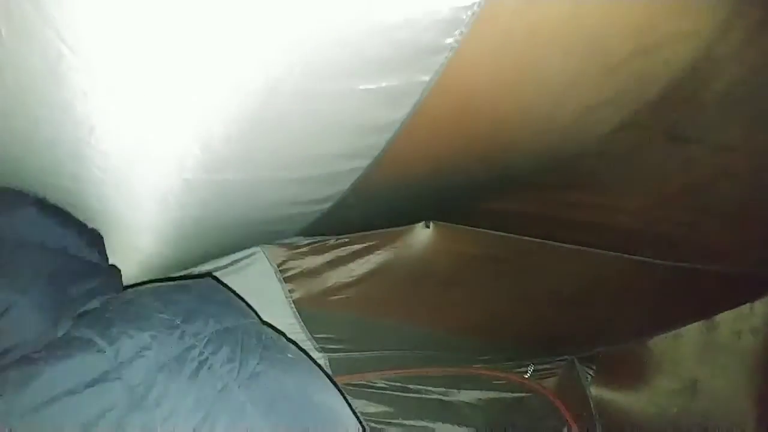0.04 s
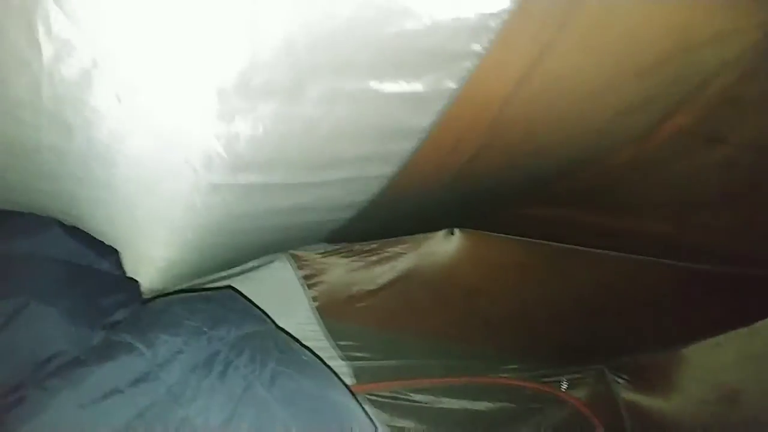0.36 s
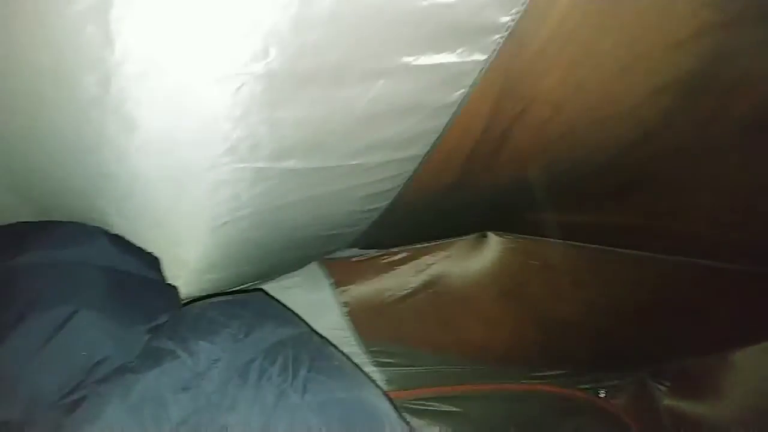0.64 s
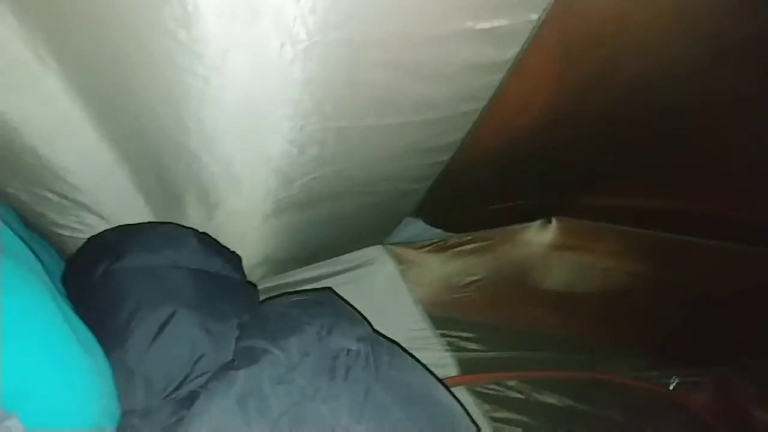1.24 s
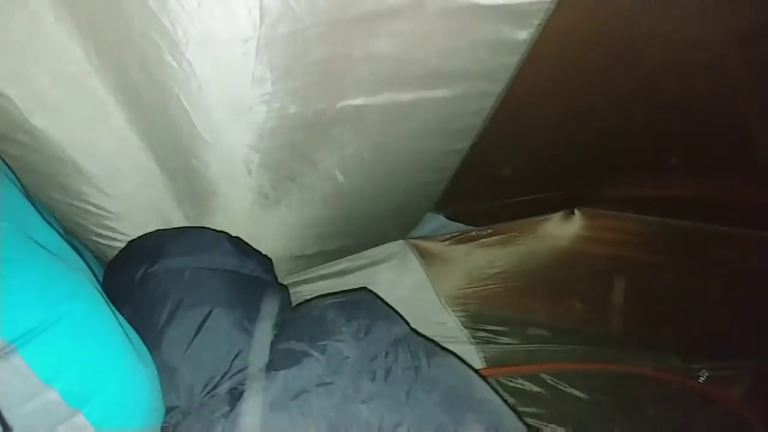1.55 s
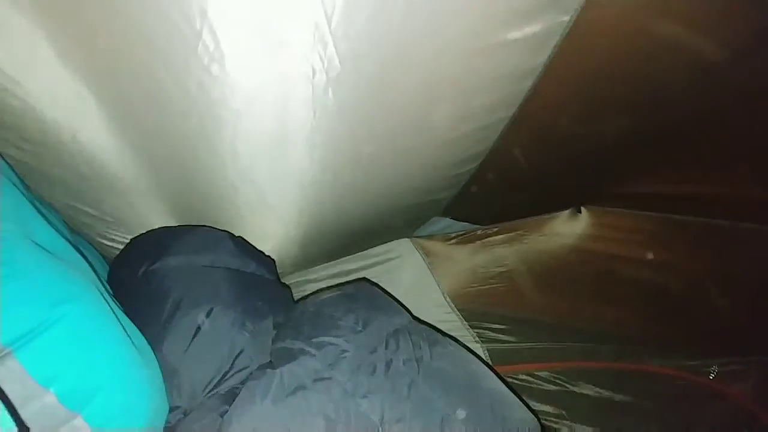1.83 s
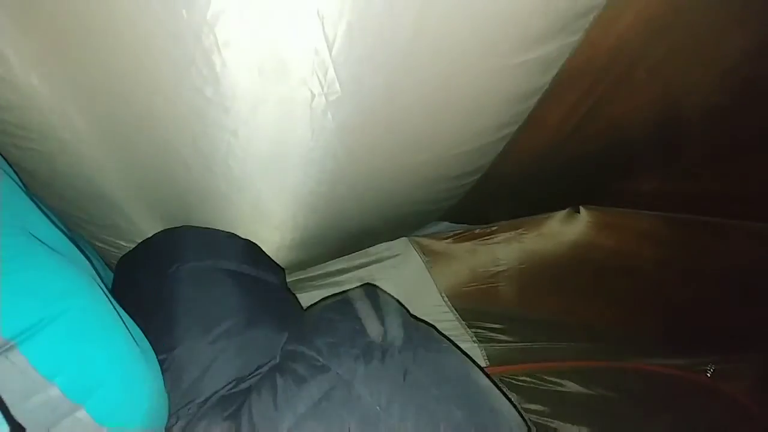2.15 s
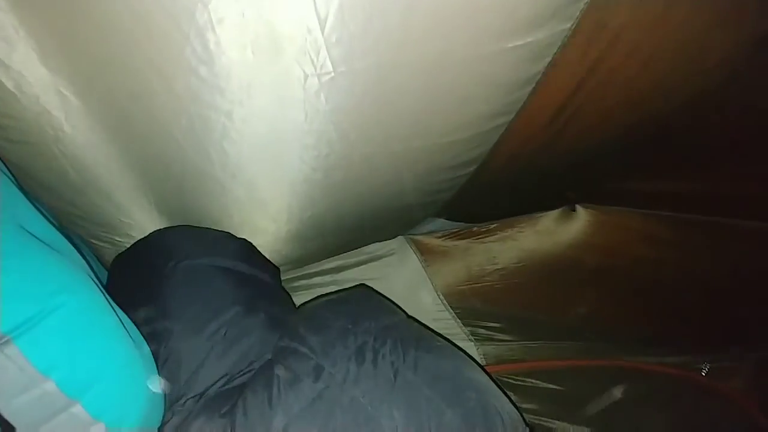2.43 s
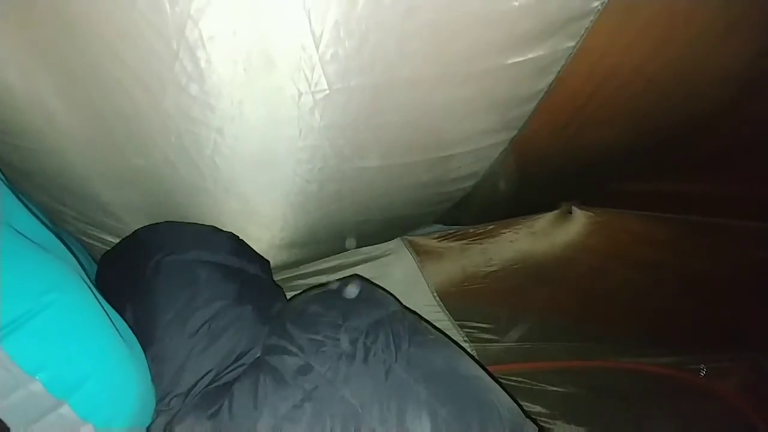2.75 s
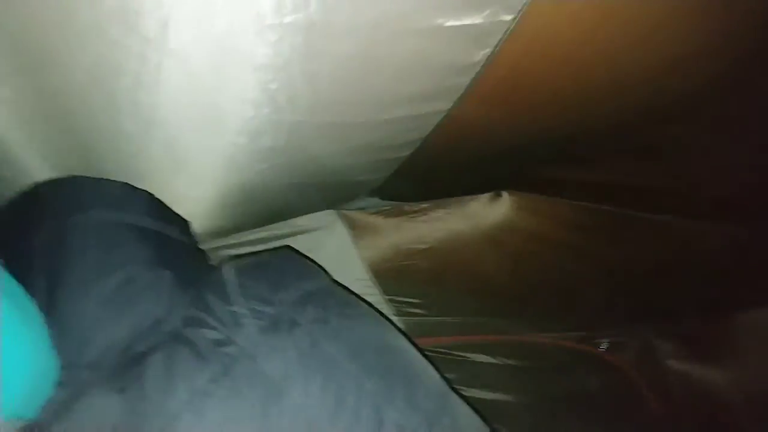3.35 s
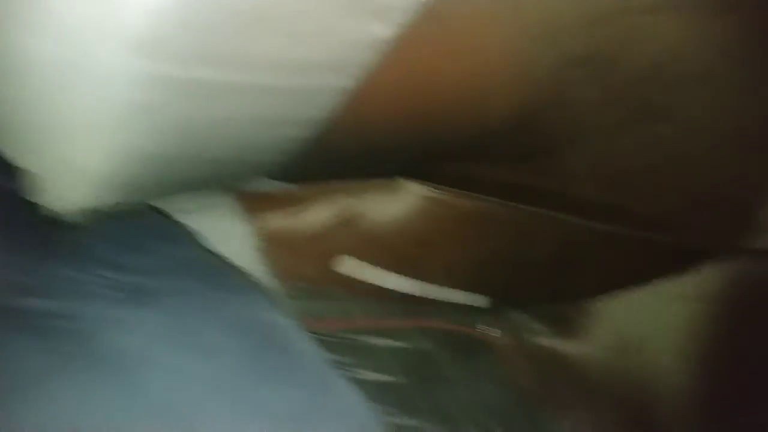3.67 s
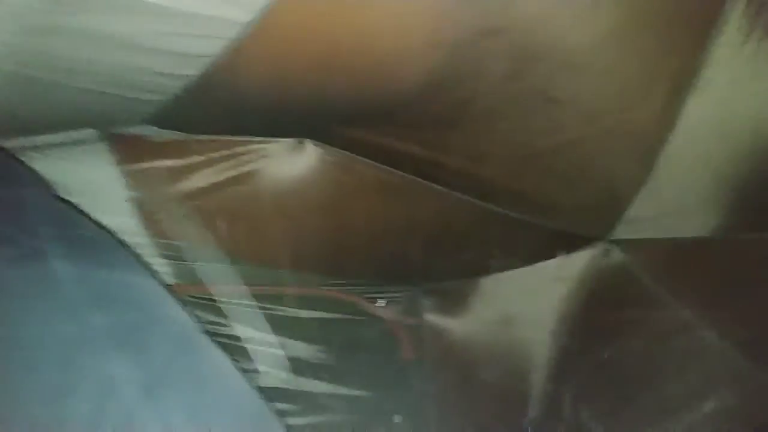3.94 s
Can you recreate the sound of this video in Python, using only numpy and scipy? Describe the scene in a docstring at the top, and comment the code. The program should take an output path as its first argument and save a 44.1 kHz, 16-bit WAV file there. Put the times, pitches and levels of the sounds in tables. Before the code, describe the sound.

Tent fabric flaps and drums unevenly in rumbling wind, heard from inside. A gust brings thumps, rustling and a crease snap in the first 0.7 seconds. The wind then eases, with small ticks on the cloth just after 1 second and between 2.5 and 2.9 seconds. From 3 seconds it builds again, with swishes, thumps and flaps strongest around 3.5 to 3.9 seconds.

```python
"""Tent walls in gusty wind, heard from inside: taut panels drum in quick uneven beats,
thump as they fill with air and flap where loose. The fabric rustles, hisses and swishes as it
slides; creases snap. Behind it, turbulent air rumbles and rushes over the walls.
The wind eases midway, where a few small ticks stand out, then builds again."""
import sys
import numpy as np
from scipy import signal
from scipy.fft import rfft, irfft
from scipy.io import wavfile

SR = 44100
rng = np.random.default_rng(int(sys.argv[2]) if len(sys.argv) > 2 else 0)


def dump(signal):
    """Clip the signal to [-1, 1] and save it as 16-bit WAV at the path in sys.argv[1]."""
    limited = np.clip(np.atleast_2d(signal).T, -1, 1)
    pcm = np.round(limited * 32767).astype(np.int16)
    wavfile.write(sys.argv[1], SR, pcm)


N = 176400
T = np.arange(N) / SR

# Level curves. Each row: time in seconds, relative level in dB.
AIR_PRESSURE_DB = [(0, -48), (.14, -33), (.3, -38.5), (.6, -41.5), (.83, -41.5), (.93, -48), (1.2, -45),
                   (1.39, -43.5), (1.48, -42.5), (1.62, -43), (1.9, -52), (1.97, -43), (2.18, -50),
                   (2.37, -44.5), (2.66, -53), (3, -43.5), (3.3, -45), (3.6, -44.5), (3.72, -42), (4, -43)]
GUST_DB = [(0, -45.5), (.09, -39.5), (.125, -40), (.25, -37.5), (.31, -43), (.48, -42), (.57, -40.5),
           (.7, -46), (.84, -46), (1.08, -49), (1.22, -45.5), (1.36, -50), (1.6, -53.5), (1.74, -53),
           (2.06, -46), (2.15, -54), (2.23, -46), (2.32, -53.5), (2.6, -55), (2.85, -50.5), (2.93, -45),
           (3.15, -47), (3.34, -43), (3.4, -41), (3.59, -46.5), (3.68, -50), (3.78, -45.5), (3.815, -35),
           (3.86, -47.5), (3.91, -42), (3.95, -47), (4, -46)]
HISS_DB = [(0, -48.5), (.1, -54), (.45, -58), (.6, -51.5), (.65, -57), (.85, -58.5), (1.02, -63.5),
           (1.14, -60), (1.235, -57), (1.3, -66.5), (1.37, -57.5), (1.43, -63), (1.68, -65.5), (1.96, -63),
           (2.05, -59.5), (2.12, -65.5), (2.87, -64.5), (2.92, -61.5), (3.15, -55), (3.22, -62),
           (3.34, -61), (3.4, -56.5), (3.595, -55.5), (3.61, -65), (3.69, -63), (3.73, -57), (3.86, -59.5),
           (3.91, -53), (4, -63)]
RUBBING_DB = [(0, -50), (.1, -41), (.18, -52), (.24, -42), (.31, -43.5), (.46, -43.5), (.57, -38),
              (.63, -40), (.69, -45), (.84, -47.5), (1.02, -50), (1.17, -47), (1.28, -50), (1.54, -52),
              (1.67, -56), (1.96, -53), (2.06, -49), (2.13, -55), (2.85, -55), (2.93, -46.5), (3.02, -45),
              (3.14, -47), (3.18, -49.5), (3.33, -46.5), (3.39, -40), (3.59, -39), (3.61, -48.5),
              (3.68, -50), (3.73, -45), (3.83, -44), (3.85, -51), (4, -49)]
DRUMMING_DB = [(0.0, -62), (0.02, -38), (0.17, -35.5), (0.41, -40.5), (0.46, -36), (0.54, -40), (0.57, -37),
               (0.61, -39.5), (2.8, -43), (3.53, -37.5), (3.63, -38), (3.66, -43.5), (3.75, -45),
               (3.83, -33.5), (3.87, -39.5), (4.0, -41.5)]

# Sheet sliding on sheet. Each row: middle in seconds, length in seconds, relative level in dB,
# centre in Hz, fall on either side in dB per octave.
SWISH_EVENTS = [(0.229, 0.042, -41.5, 2240, 17), (.545, 0.014, -38, 2780, 10),
                (.569, 0.019, -38.5, 2660, 23), (0.597, 0.021, -48, 5450, 22), (2.956, .05, -51, 1800, 25),
                (3.008, 0.064, -43.5, 1750, 38), (3.012, 0.045, -52.5, 4400, 32),
                (3.133, 0.065, -47, 1900, 42), (3.438, 0.15, -45.5, 3640, 27),
                (3.548, 0.025, -37.5, 4620, 24), (3.549, .07, -40.5, 2960, 45),
                (3.587, 0.031, -32.5, 4150, 19), (3.728, .07, -44.5, 3050, 26),
                (3.757, 0.013, -35, 3270, 15), (3.82, 0.05, -45, 3420, 15)]
# Ticks on the fabric. Each row: start in seconds, peak in dB, left over right in dB.
TICK_EVENTS = [(0.594, -42, -3), (1.064, -37, 0), (1.154, -31, 0), (1.236, -42, 2), (2.5175, -33, -2),
               (2.608, -33.5, -1), (2.649, -37, -4), (2.731, -34, 1), (2.804, -34.5, -3),
               (2.8955, -30.5, 2), (3.757, -34, 2)]
# Crease snaps and panel flaps. Each row: start in seconds, relative level in dB,
# left over right in dB, pitch in Hz.
SNAP_EVENTS = [(0.2686, -19, -3, 4260), (0.566, -25, -3, 2480), (1.064, -39, 4, 3530),
               (1.388, -38, 14, 5300), (2.279, -38, 4, 4430), (3.001, -33, -12, 1960),
               (3.018, -29.5, 5, 4230), (3.592, -28, 2, 3450), (3.815, -35, -2, 3850),
               (3.832, -34, 1, 3350)]
FLAP_EVENTS = [(0.116, -26, 8.5, 690), (0.153, -32, -5, 430), (0.181, -37, -8, 424),
               (0.222, -28.5, -8, 447), (0.774, -37, -4, 445), (1.832, -37.5, 2, 380), (2.232, -53, 2, 600),
               (2.421, -40, -1, 543), (3.383, -30.5, 0, 404), (3.446, -38, 0, 424), (3.811, -27, 2, 506),
               (3.835, -30, -2.5, 306), (3.893, -28, 3, 420), (3.9895, -28, -5, 920)]
# Wall pulled taut. Each row: start in seconds, envelope peak in dB, starting pitch in Hz.
THUMP_EVENTS = [(0.147, -22, 89), (0.235, -27, 130), (0.463, -28, 126), (0.562, -23.5, 130),
                (1.298, -37.5, 95), (1.628, -29, 141), (2.228, -31.5, 131), (2.995, -29.5, 139),
                (3.558, -26, 185), (3.588, -23.5, 183), (3.624, -21, 152), (3.829, -28, 175)]

# Source spectra. Each row: frequency in Hz, relative density in dB.
RUMBLE_SPECTRUM = [(10, -43), (24, -13), (38, -2.5), (62, 1), (85, 3.5), (115, -12.5), (250, -43),
                   (2000, -90)]
RUSH_SPECTRUM = [(130, -26), (230, -4.5), (310, 0.5), (420, -2), (550, -2), (700, -6), (950, -5),
                 (1300, -13), (2200, -16), (5000, -62), (16000, -75)]
HISS_SPECTRUM = [(2500, -9.5), (5000, 3), (6500, -3), (7600, 2), (8800, -0.5), (10200, -8.5), (12000, -13),
                 (16000, -23.5)]
RUSTLE_SPECTRUM = [(400, -31), (900, -7.5), (1300, 1), (2000, 1.5), (2700, -1.5), (3600, -2.5), (4500, -3),
                   (5400, -6), (6400, -14), (9000, -21), (16000, -28)]
TICK_SPECTRUM = [(300, -13), (1500, -1), (3000, -8), (5000, -2), (7000, -5.5), (9500, -4.5), (12000, -18.5),
                 (16000, -21)]
SNAP_SPECTRUM = [(500, -25), (2000, -13), (2900, -8), (3500, -20), (4500, -11), (5300, -11), (8000, -16.5),
                 (11000, -29), (16000, -30)]
FLAP_SPECTRUM = [(60, -22.5), (200, -16.5), (400, -2.5), (800, -16.5), (1300, -5.5), (2500, -26.5),
                 (6000, -37), (16000, -65)]
PANEL_SPECTRUM = [(45, -27.5), (75, -14), (95, -2.5), (130, 1.5), (170, -2.5), (200, -5), (235, -14.5),
                  (320, -15.5), (420, -20), (800, -57), (4000, -73)]
# Likeness of left and right. Each row: frequency in Hz, correlation from 0 to 1.
STEREO_CORRELATION = [(30, 0.95), (60, 0.82), (130, 0.85), (290, 0.84), (640, 0.49), (1400, 0),
                      (16000, 0.03)]


def amp(db):
    """Decibels to gain."""
    return 10 ** (np.asarray(db) / 20)


def unit(x):
    """Scales to rms 1."""
    return x / np.sqrt(np.mean(x ** 2) + 1e-20)


def at_hz(table, hz):
    """Table lookup on a log-frequency axis."""
    table_hz, values = np.transpose(table)
    return np.interp(np.log(hz + 1), np.log(table_hz + 1), values)


def level(curve_db):
    """Level curve to gain per sample."""
    return amp(np.interp(T, *np.transpose(curve_db)))


def pan(left_db):
    """Stereo gains; positive is left."""
    return amp([[left_db / 2], [-left_db / 2]])


def add(mix, start_s, sound):
    """Mixes a sound in place."""
    part = mix[:, round(start_s * SR):][:, :sound.shape[1]]
    part += sound[:, :part.shape[1]]


def noise(size=N):
    """Two independent white noises."""
    return rng.standard_normal((2, size))


def wander(hz):
    """Random drift below a rate, rms 1."""
    ratio = np.fft.rfftfreq(N, 1 / SR) / hz
    return unit(irfft(rfft(rng.standard_normal(N)) / (1 + ratio ** 4), N))


def flutter(hz):
    """Random flicker around a rate, rms 1."""
    ratio = np.fft.rfftfreq(N, 1 / SR) / hz
    return unit(irfft(rfft(rng.standard_normal(N)) * ratio / (1 + ratio ** 3), N))


def grains(per_s, spread_db, decay_s):
    """Tiny random noise bursts of uneven strength."""
    sizes = amp(spread_db * np.minimum(rng.exponential(1, N), 4))
    onsets = rng.random(N) < per_s / SR
    power = signal.lfilter([1], [1, -np.exp(-2 / (decay_s * SR))], (sizes * onsets) ** 2)
    return unit(np.sqrt(power) * noise())


def colour(pair, spectrum):
    """Minimum-phase filter; also correlates the channels in the bass."""
    hz = abs(np.fft.fftfreq(pair.shape[1], 1 / SR))
    log_gain = np.log(amp(at_hz(spectrum, hz)))
    response = np.exp(np.conj(signal.hilbert(log_gain)))
    correlation = np.clip(at_hz(STEREO_CORRELATION, hz), 0, 1)
    left, independent = np.fft.fft(pair)
    right = correlation * left + np.sqrt(1 - correlation ** 2) * independent
    return np.fft.ifft(response * np.array([left, right])).real


def steadied(x, window_s):
    """Evens out swells longer than the window; rms 1."""
    power = signal.fftconvolve((x ** 2).mean(0), np.hanning(int(window_s * SR)), "same")
    return unit(x / np.sqrt(abs(power) + 1e-12))


def air_rumble():
    """Turbulent air pumps the whole tent, more on the right."""
    rumble = steadied(colour(noise(), RUMBLE_SPECTRUM), window_s=0.4)
    return amp(0.4) * pan(-7.5) * level(AIR_PRESSURE_DB) * rumble


def wind_rush():
    """Wind rushes over the walls, with soft pats of rippling cloth."""
    drive = noise() + amp(-3.5) * grains(per_s=150, spread_db=3, decay_s=0.0032)
    rush = steadied(colour(drive, RUSH_SPECTRUM), window_s=0.077)
    return amp(-0.5) * pan(-2.2) * level(GUST_DB) * rush


def cloth_hiss():
    """Smooth cloth slides with a fine, flickering hiss."""
    hiss = colour(noise(), HISS_SPECTRUM)
    flicker_db = 1.03 * flutter(hz=21.8) + 0.56 * flutter(hz=200)
    return amp(4.5) * pan(0.3) * level(HISS_DB) * unit(hiss * amp(flicker_db))


def cloth_rustle():
    """Fabric rubs and crinkles, flickering as it flutters."""
    drive = noise() + amp(-4) * grains(per_s=400, spread_db=4, decay_s=0.0017)
    rustle = colour(drive, RUSTLE_SPECTRUM) * amp(1.05 * flutter(hz=35.4))
    return amp(0.8) * pan(-0.72) * level(RUBBING_DB) * steadied(rustle, window_s=0.15)


def sheet_swishes():
    """A sheet slides and stops: a swell of friction noise around one pitch."""
    out, t = np.zeros((2, N)), np.arange(8192) / SR
    flicker = amp(1.2 * flutter(hz=150))
    octaves = np.arange(-32, 33) / 8
    distance_oct = np.hypot(octaves, 0.15) - 0.15  # rounds the band's top
    for middle_s, length_s, db, centre_hz, fall_db_per_oct in SWISH_EVENTS:
        band_db = np.maximum(-fall_db_per_oct * distance_oct, -70)
        band = np.column_stack([centre_hz * 2 ** octaves, band_db])
        friction = unit(colour(noise(len(t)), band))
        swell = np.sin(np.pi * np.minimum(t / length_s, 1))
        add(out, middle_s - length_s / 2, amp(db) * swell * friction)
    return pan(-1.5) * flicker * out


def wall_reflections(x, wet_db, reach_s, count=14):
    """Close walls add quick reflections, different in each channel."""
    out = x.copy()
    gain = amp(wet_db) / np.sqrt(count)
    for channel in range(2):
        for place, sign in zip(rng.random(count), rng.choice([-1, 1], count)):
            lag = 20 + int(place * reach_s * SR)
            out[channel, lag:] += sign * gain * x[channel, :-lag]
    return out / np.sqrt(1 + amp(wet_db) ** 2)


def crackles(events, spectrum, crack_s, tail_db, tail_s):
    """Each hit crackles briefly in the cloth and scatters off the walls."""
    out, t = np.zeros((2, N)), np.arange(4096) / SR
    envelope = np.exp(-t / crack_s) + amp(tail_db) * np.exp(-t / tail_s)
    for start_s, db, left_db, *_ in events:
        burst = colour(envelope * noise(len(t)), spectrum)
        burst /= abs(burst).max(1, keepdims=True)
        add(out, start_s, amp(db) * pan(left_db) * burst)
    return out


def swing(t, hz, rise_s, sag_per_s=0):
    """Cloth pulled tight swings out and dies in a few cycles; pitch may sag."""
    envelope = (t / rise_s * np.exp(1 - t / rise_s)) ** 2
    cycles = np.cumsum(hz * np.exp(-sag_per_s * t)) / SR
    return -envelope * np.sin(2 * np.pi * cycles)


def direct_swings(events, rise_cycles, left_lag_s=0.00029):
    """Direct sound of flaps or snaps, arriving on the right first."""
    out, t = np.zeros((2, N)), np.arange(2048) / SR
    for start_s, db, left_db, hz in events:
        add(out, start_s, amp(db) * pan(left_db) * swing(t, hz, rise_s=rise_cycles / hz))
    return np.array([np.interp(T - left_lag_s, T, out[0]), out[1]])


def fabric_ticks():
    """Small bright ticks on the fabric."""
    return crackles(TICK_EVENTS, TICK_SPECTRUM, crack_s=0.0017, tail_db=-17, tail_s=0.016)


def crease_snaps():
    """A crease snaps: a high swing plus crackle."""
    crackle = crackles(SNAP_EVENTS, SNAP_SPECTRUM, crack_s=0.0011, tail_db=-6, tail_s=0.0056)
    return direct_swings(SNAP_EVENTS, rise_cycles=1.6) + amp(-6.5) * crackle


def panel_flaps():
    """A loose panel flaps: a midrange swing plus dull crackle."""
    crackle = crackles(FLAP_EVENTS, FLAP_SPECTRUM, crack_s=0.00093, tail_db=-8, tail_s=0.011)
    return direct_swings(FLAP_EVENTS, rise_cycles=0.91) + amp(-2.5) * crackle


def wall_thumps():
    """A wall fills with air and stops short: a low, heavily damped swing."""
    out, t = np.zeros((2, N)), np.arange(4096) / SR
    for start_s, db, hz in THUMP_EVENTS:
        add(out, start_s, amp(db) * pan(0) * swing(t, hz, rise_s=0.0056, sag_per_s=10))
    return out


def panel_drumming():
    """Taut panels shudder in quick uneven beats."""
    beat_hz = 15 * (1 + 0.391 * wander(hz=8.8))
    beat_db = 1.94 * np.sin(2 * np.pi * np.cumsum(beat_hz) / SR)
    shudder = steadied(colour(noise(), PANEL_SPECTRUM), window_s=0.066) * amp(beat_db)
    return amp(-1) * pan(0.9) * level(DRUMMING_DB) * unit(shudder)


def scene():
    """The windblown tent from inside."""
    hits = crease_snaps() + fabric_ticks() + panel_flaps() + wall_thumps()
    friction = cloth_rustle() + cloth_hiss() + sheet_swishes()
    fabric = wall_reflections(friction, wet_db=-12, reach_s=0.025)
    return air_rumble() + panel_drumming() + wind_rush() + fabric + hits


def record(dry):
    """Linear-phase low-pass."""
    cutoff_hz = 15850
    taps = signal.firwin(511, cutoff_hz, window=("kaiser", 9), fs=SR)
    return signal.oaconvolve(dry, taps[None], "same")


dry = scene()
out = record(dry)
dump(out)
```